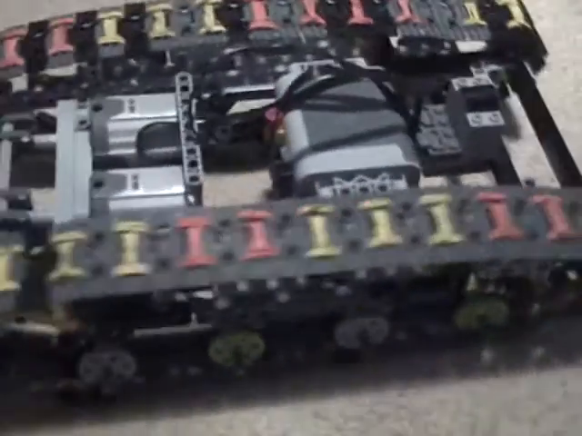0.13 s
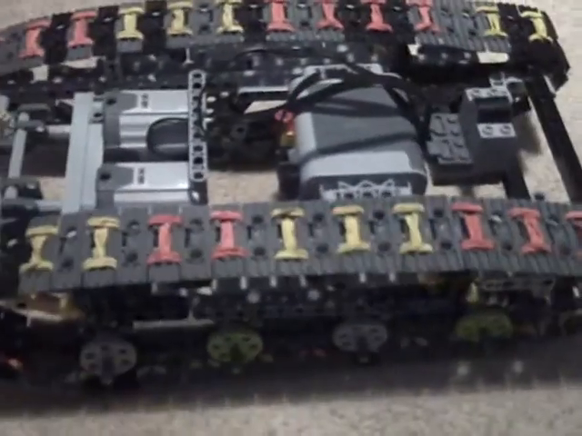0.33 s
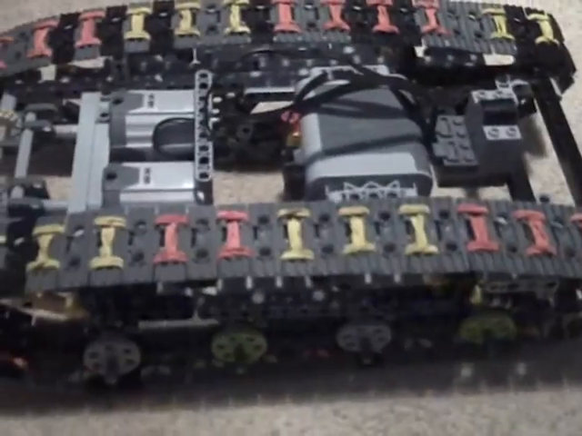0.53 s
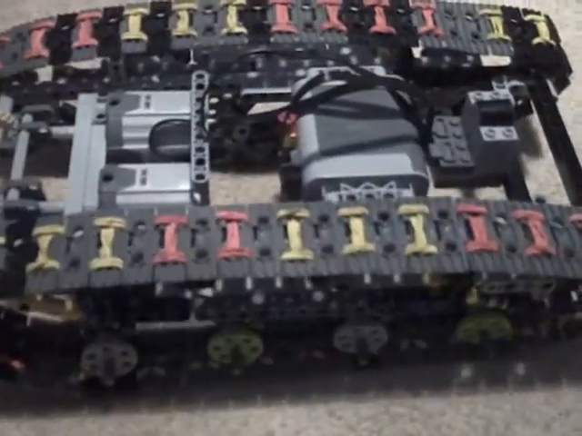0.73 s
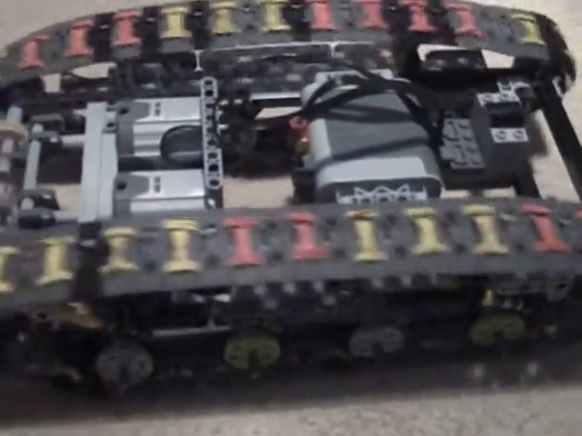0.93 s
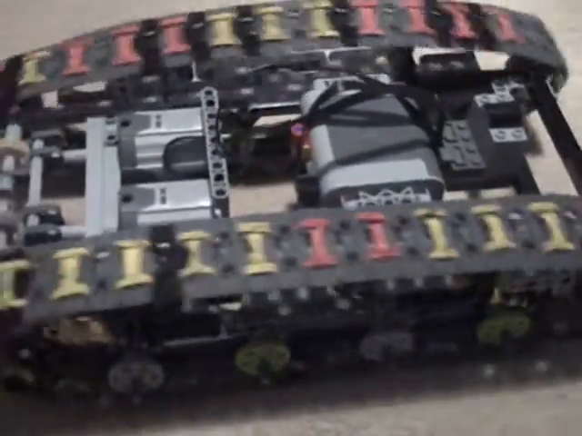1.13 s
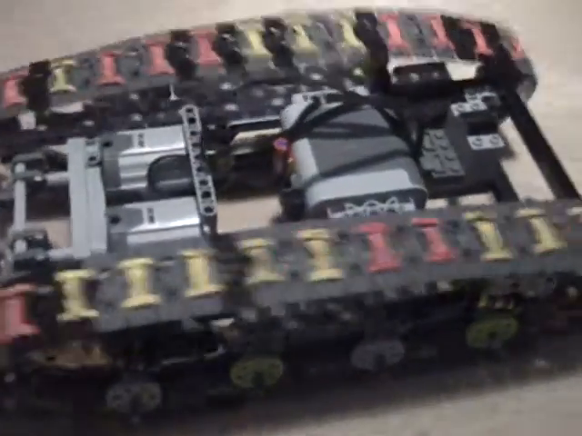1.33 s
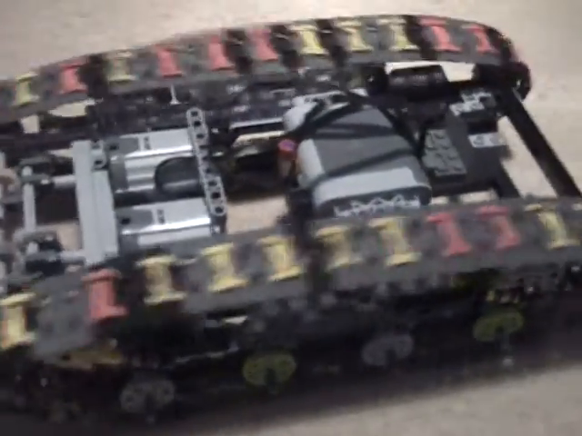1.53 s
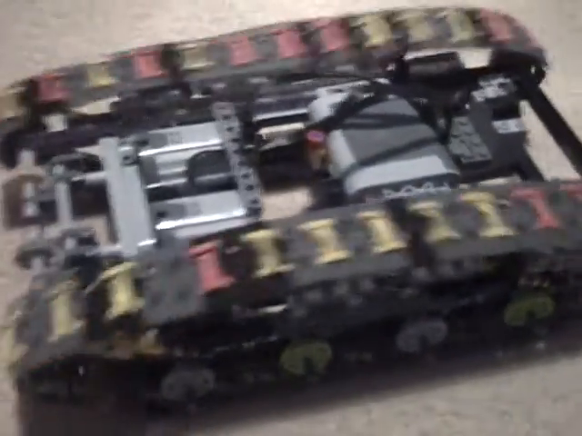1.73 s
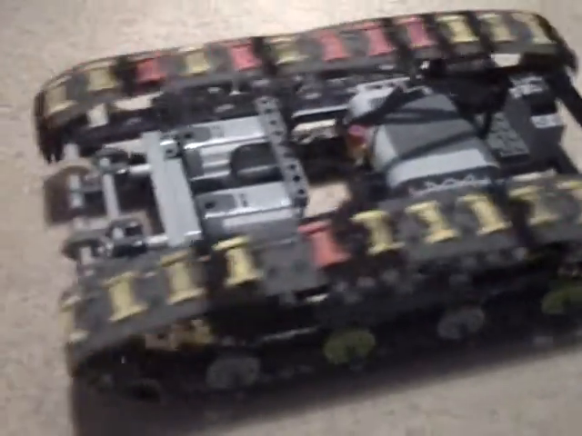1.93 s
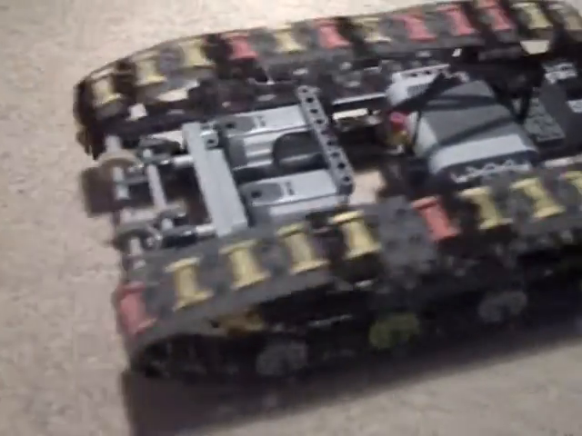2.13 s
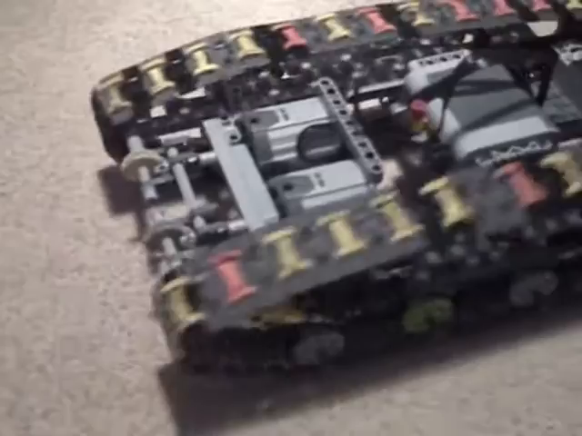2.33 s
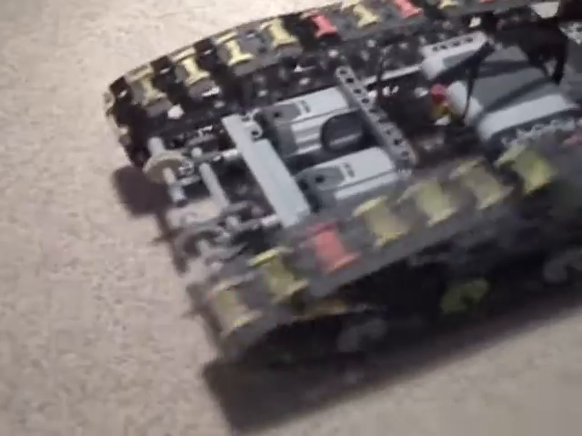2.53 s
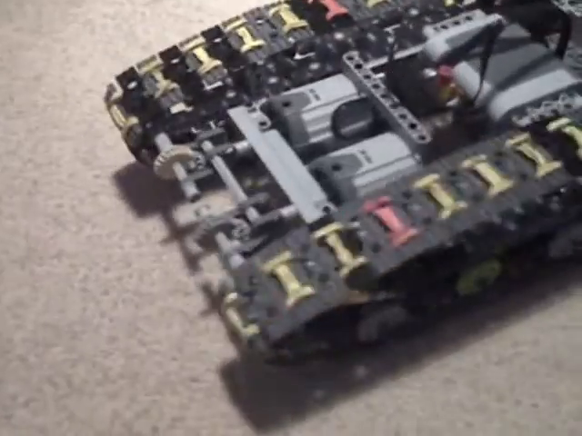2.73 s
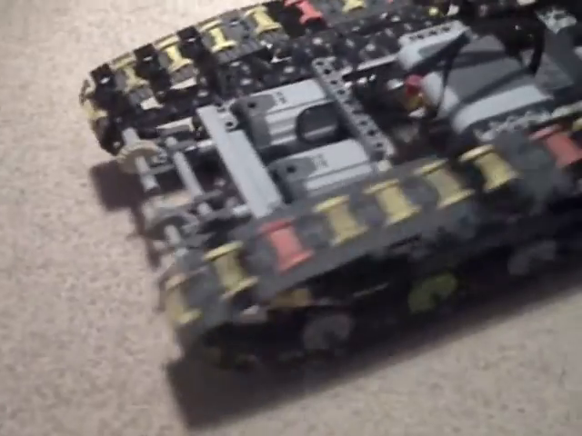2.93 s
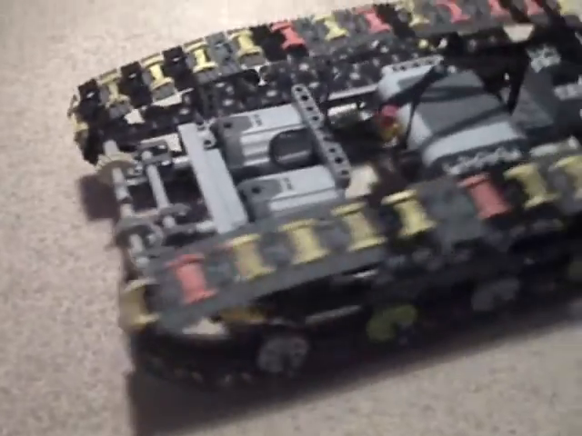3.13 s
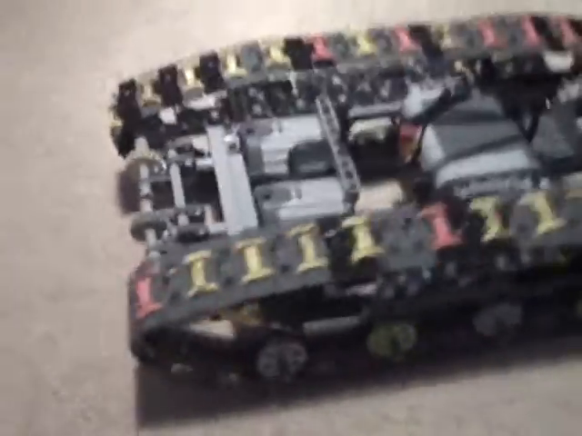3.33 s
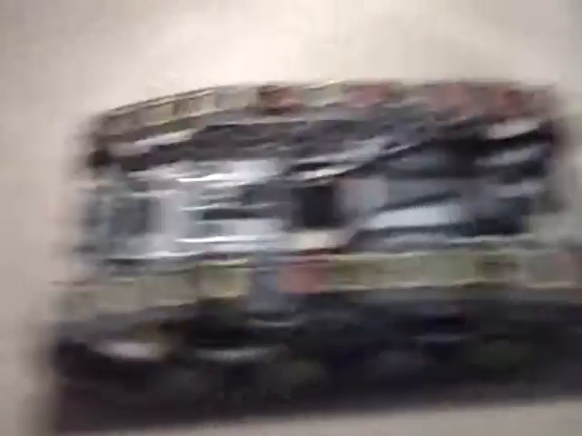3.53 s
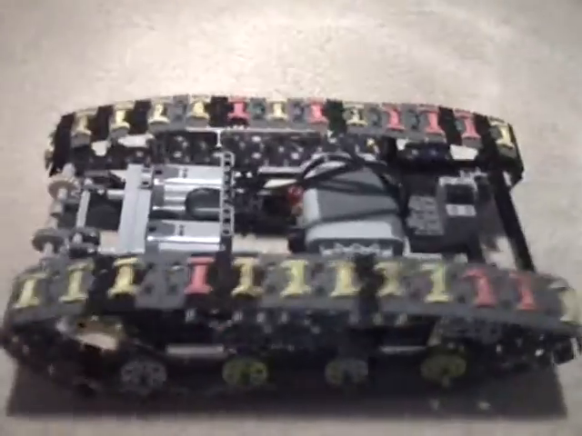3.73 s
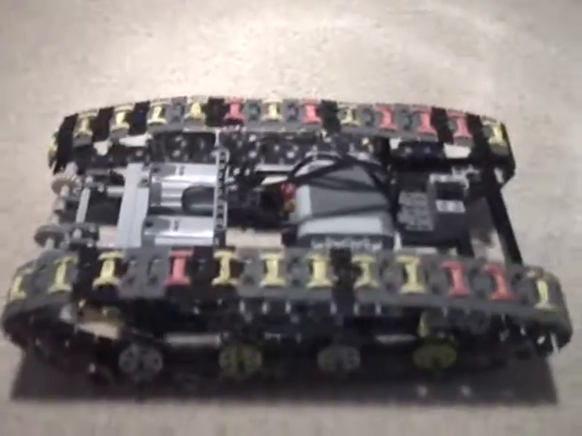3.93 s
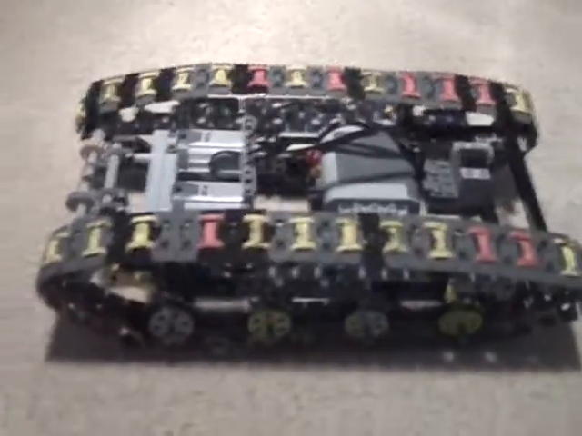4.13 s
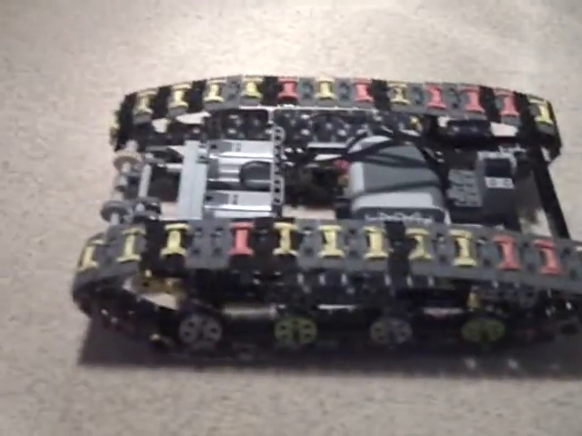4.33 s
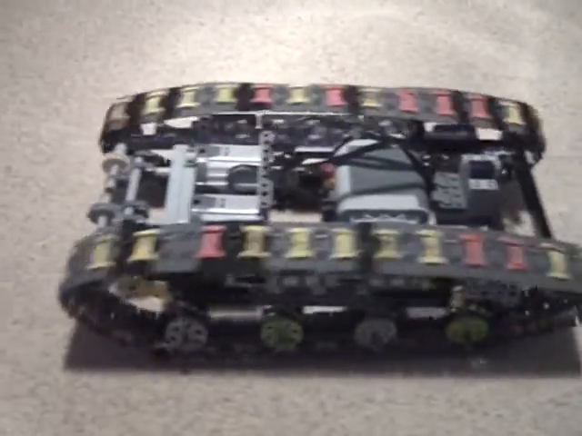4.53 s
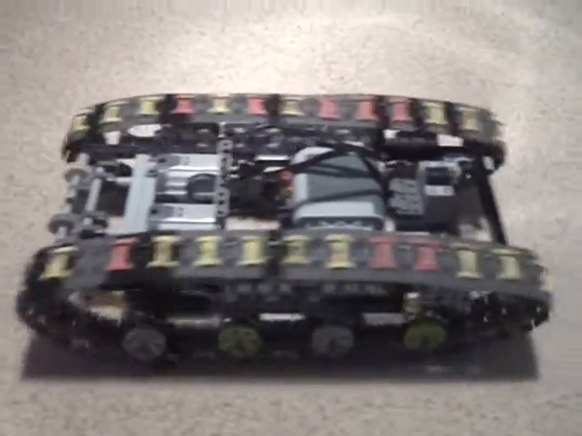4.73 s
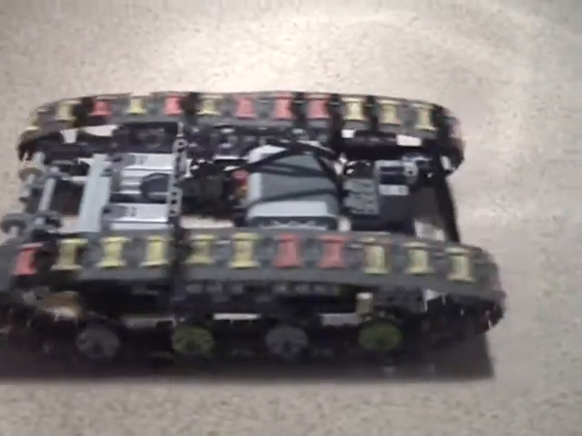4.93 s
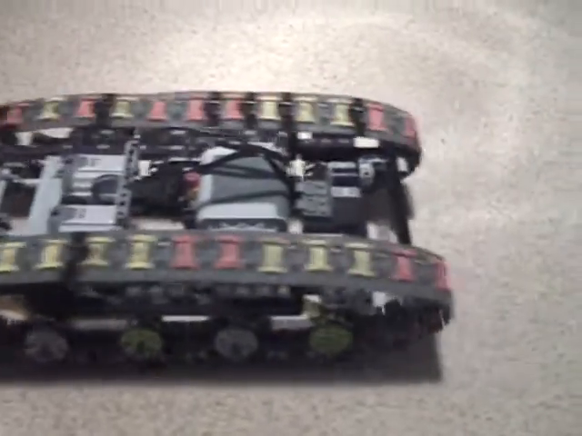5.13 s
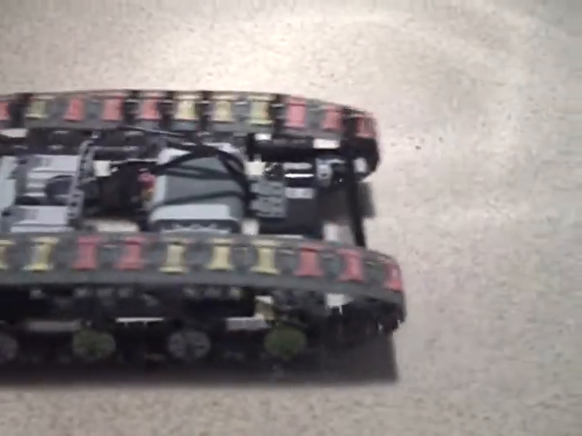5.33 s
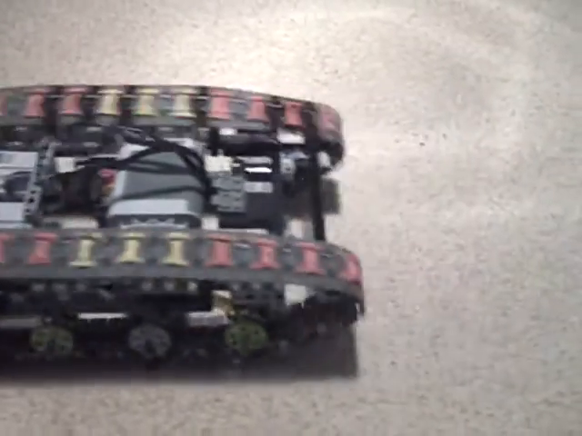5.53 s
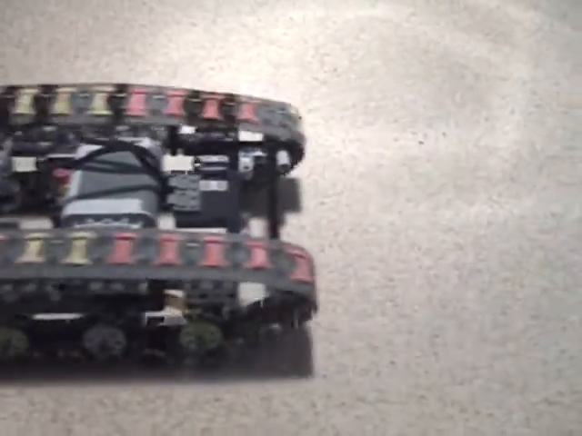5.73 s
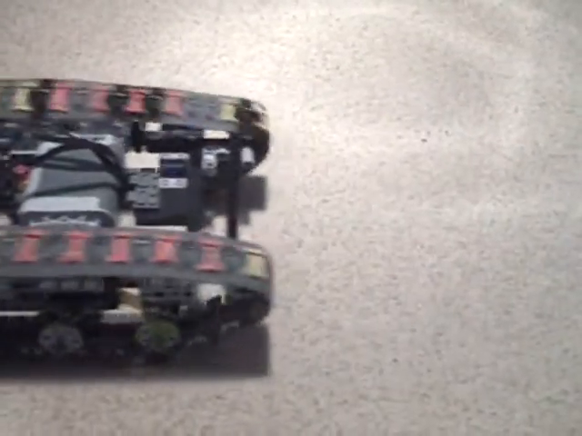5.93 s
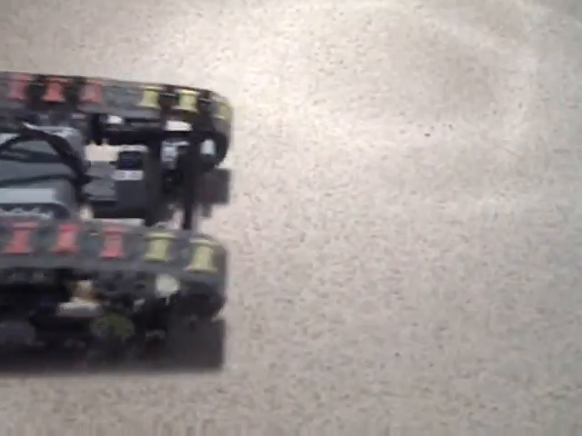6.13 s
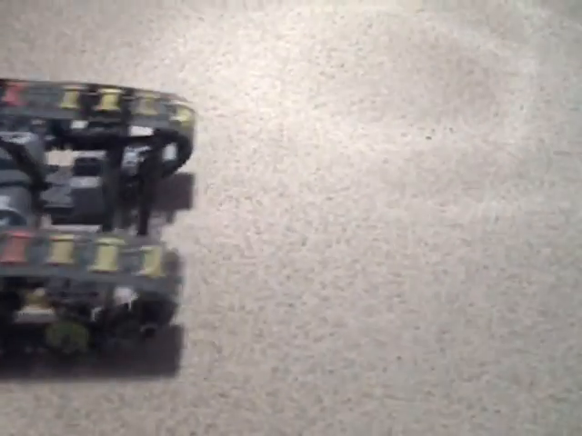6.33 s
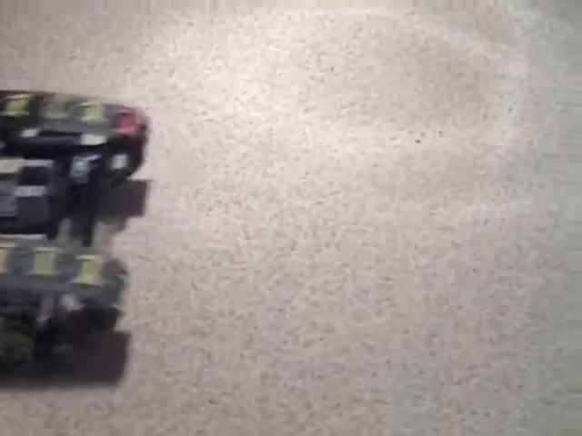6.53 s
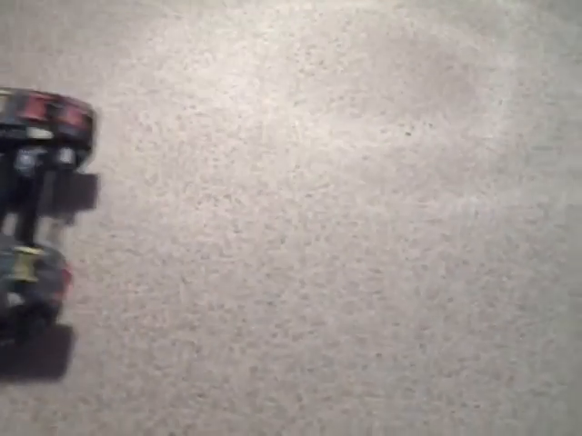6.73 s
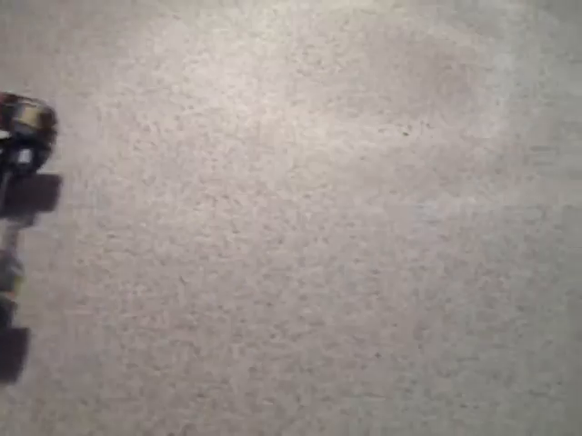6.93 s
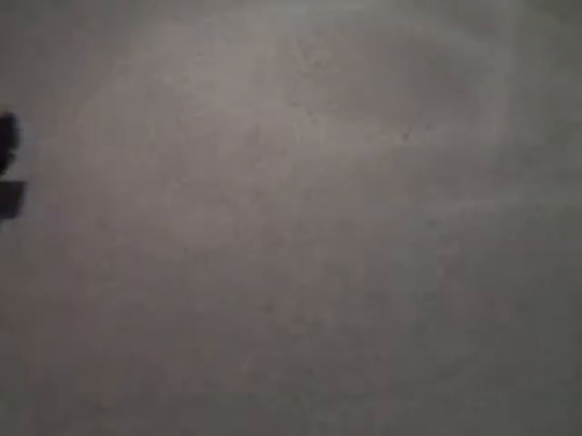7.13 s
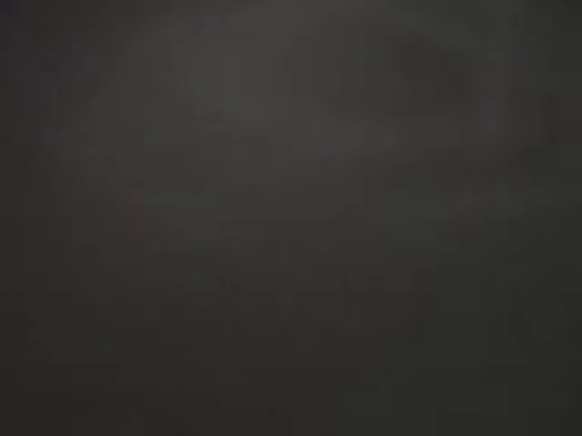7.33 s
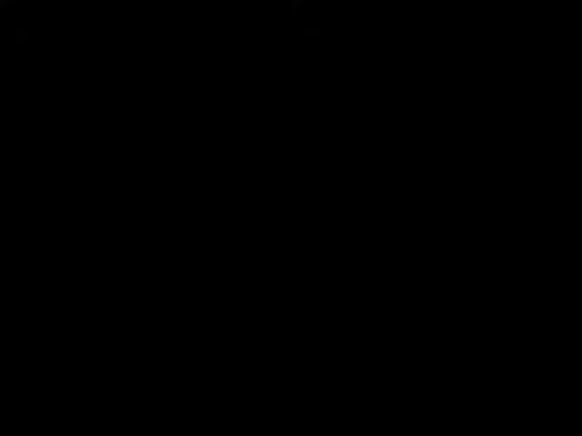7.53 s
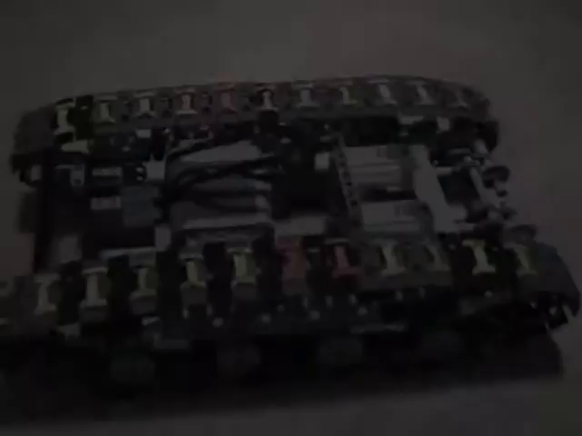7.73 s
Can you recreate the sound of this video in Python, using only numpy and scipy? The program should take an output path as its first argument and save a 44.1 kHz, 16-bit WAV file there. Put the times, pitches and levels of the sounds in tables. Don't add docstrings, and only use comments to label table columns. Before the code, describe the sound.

A small motorized tracked toy whines and rattles over carpet in long runs with short ticking nudges between, then fades to silence before a faint thump.

```python
import sys
import numpy as np
from scipy import signal
from scipy.fft import rfft, irfft
from scipy.io import wavfile
from scipy.ndimage import uniform_filter1d

SR = 44100
rng = np.random.default_rng(int(sys.argv[2]) if len(sys.argv) > 2 else 0)


def attenuation_scalar(level_db):
    decades = np.asarray(level_db, float) / 20
    return 10 ** decades


def master_out(mix):
    frames = np.transpose(np.atleast_2d(mix))
    ceiling = np.clip(frames, -1, 1)
    pcm = np.round(ceiling * 32767).astype(np.int16)
    wavfile.write(sys.argv[1], SR, pcm)


N = 343980
JAB_SHARE = 0.51

# missing_speed_share, spin_up_s, second_motor_db (against the first)
STARTS = [
    (0, .17, -14),
    (.43, .18, -9),
    (0, .17, -16),
    (.46, .16, -2.5),
]
# start_s, driven_s, gearbox_level_db, coasting_decay_db_per_s, ticking_on_s
NUDGES = [
    (.579, 0.045, -44, 250, .07),
    (.693, .038, -48.5, 330, .08),
    (.911, 0.027, -41, 300, .005),
    (2.21, 0.05, -40, 299, 0),
    (2.869, .08, -51.5, 300, 0.018),
    (4.122, 0.017, -50, 214, .045),
    (4.184, .039, -46, 700, .068),
    (4.289, .036, -52, 212, .06),
]


def level(x, db):
    return x * attenuation_scalar(db) / np.sqrt(np.mean(x ** 2))


def curves(table):
    s, *columns = np.transpose(table)
    return [np.interp(np.arange(N) / SR, s, c) for c in columns]


def held(table):
    s, *columns = np.transpose(table)
    row = np.searchsorted(s, np.arange(N) / SR, "right") - 1
    return [uniform_filter1d(c[row], size=1300) for c in columns]


def walk(rate):
    k = int(SR / rate)
    steps = np.repeat(rng.standard_normal(N // k + 1), k)
    return 1.345 * uniform_filter1d(uniform_filter1d(steps, k), k)[:N]


def ring(x, modes):
    out = 0
    for k, (hz, width, db) in enumerate(modes):
        mode = signal.lfilter(*signal.iirpeak(hz, hz / width, SR), x)
        out = out + (-1) ** k * attenuation_scalar(db) * mode
    return out


def coloured(spectrum):
    hz, db = np.transpose(spectrum)
    shape = np.interp(np.log(np.fft.rfftfreq(N, 1 / SR) + 1), np.log(hz), db)
    return level(irfft(rfft(rng.standard_normal(N)) * attenuation_scalar(shape), N), 0)


def drive():
    # time_s, free_tooth_rate_hz, gearbox_level_db, frame_db (against the gearbox)
    runs = [
        [(-.3, 918, -37.5, 2), (.23, 924, -37.5, -1), (.33, 859, -38, 0), (.415, 838, -41.5, 3)],
        [(.935, 1120, -32.5, 3), (1.1, 1120, -32.5, -3.5), (1.47, 1125, -33, -4.5), (1.8, 1150, -32.5, -5),
         (2.0, 1128, -33.5, -4.5), (2.38, 1215, -34.5, -5), (2.57, 1140, -34, -6), (2.76, 1005, -36.5, -4.5),
         (2.85, 995, -36.5, -1.5)],
        [(2.945, 1070, -38, -3), (3.05, 1075, -38, -5.5), (3.193, 1080, -38, -5), (3.26, 1025, -37.5, -4),
         (3.357, 925, -37, -3), (3.5, 930, -36, -2), (3.75, 915, -37, -1.5), (3.94, 906, -38, -.5),
         (3.99, 880, -41, 1)],
        [(4.59, 1065, -35, -2), (5.0, 1065, -34.5, -4), (5.3, 1070, -36, -2.5), (5.6, 1077, -35.5, -1.5),
         (6.0, 1072, -37.5, -1.5), (6.4, 1095, -37.5, -2), (7.0, 1092, -38.5, -1), (7.7, 1090, -40, -1.5)],
    ]
    # slowest_s, speed_lost_hz, slowing_s, recovery_s
    snags = [(.09, 36, .09, .055), (1.342, 60, .14, .12), (1.57, 50, .1, .06), (1.73, 80, .1, .07),
             (1.89, 35, .09, .07), (2.04, 27, .08, .04), (2.15, 57, .09, .05), (2.3, 77, .11, .08),
             (2.48, 25, .1, .09), (3.357, 50, .07, .13), (3.587, 65, .1, .11), (3.811, 77, .06, .09),
             (5.283, 30, .14, .11), (5.453, 29, .06, .14), (5.667, 33, .075, .19), (5.862, 45, .15, .085),
             (6.101, 19, .1, .1), (6.465, 43, .065, .135), (6.665, 43, .065, .11), (6.869, 41, .095, .115),
             (7.144, 17, .08, .08), (7.308, 34, .085, .15)]
    swell_s = 0.044
    coast_decay_db_s, frame_coast_share = 348, 0.64
    creep_db, creep_frame_db, creep_decay_db_s = -24, 5, 118
    nudge_frame_db, rest_db = -4, -77.5

    s = np.arange(N) / SR
    hz = curves(np.vstack(runs))[0]
    for at, lost_hz, slow_s, free_s in snags:
        hz -= lost_hz * np.interp(s, (at - slow_s, at, at + free_s), (0, 1, 0))

    moves = []  # (gain, frame dB, power off s, coasting dB per s)
    for run, (lag, spin_s, _) in zip(runs, STARTS):
        since = np.maximum(s - run[0][0], 0)
        speed = 1 - lag * np.exp(-since / spin_s) * (s > run[0][0] - .05)
        hz *= speed
        _, db, frame_db = curves(run)
        gain = attenuation_scalar(db) * speed * (1 - np.exp(-since / swell_s))
        moves.append((gain, frame_db, run[-1][0], coast_decay_db_s))
    for at, on_s, db, decay_db_s, _ in NUDGES:
        gain = attenuation_scalar(db) * np.clip((s - at) / (JAB_SHARE * on_s), 0, 1) ** 2
        moves.append((gain, nudge_frame_db, at + on_s, decay_db_s))

    gear_power, frame_power = attenuation_scalar(rest_db) ** 2, attenuation_scalar(rest_db + creep_frame_db) ** 2
    gains = []
    for gain, frame_db, off, decay_db_s in moves:
        after = np.maximum(s - off, 0)
        creep = gain * attenuation_scalar(creep_db - creep_decay_db_s * after)
        gains.append(gain * attenuation_scalar(-decay_db_s * after))
        gear_power = gear_power + gains[-1] ** 2 + creep ** 2
        frame = gain * attenuation_scalar(frame_db - frame_coast_share * decay_db_s * after)
        frame_power = frame_power + frame ** 2 + (creep * attenuation_scalar(creep_frame_db)) ** 2
    gear_db = 10 * np.log10(gear_power)
    frame_db = 10 * np.log10(frame_power / gear_power)
    return hz, gains[:len(runs)], gear_db, frame_db


def whine(hz, gains):
    # start_s, harmonic_2_db, harmonic_3_db, harmonic_4_db, harmonic_5_db
    voice = [(0, -10, -14, -13, -11), (.375, -22, -26, -19, -24), (1.03, -28, -20, -12, -15),
             (1.19, -32, -21, -12, -30), (1.355, -20, -13, -21, -27), (1.92, -16, -20, -23, -30),
             (2.52, -20, -24, -17, -26), (2.9, -25, -24, -28, -26), (3.06, -12, -20, -18, -22),
             (3.24, -24, -20, -18, -13), (3.3, -11, -15, -17, -10), (3.975, -22, -24, -24, -24),
             (4.64, -20, -16, -15, -21), (4.78, -18, -15, -19, -16), (5.0, -17, -13, -19, -20),
             (5.4, -15, -14, -19, -24), (6.0, -15, -13, -17, -24), (7.3, -19, -17, -20, -28)]
    speeds = 1 + 0.00751 * walk(120), 1 + 0.01196 * walk(90) + .022 * walk(11)
    flutter_db = [[1.8 * walk(70) + .4 for _ in range(6)] for _ in speeds]
    second, third, fourth, fifth = (db + 1.5 * walk(11) for db in held(voice))
    harmonics_db = [second - 15, second, third, fourth, fifth, third - 5]
    twin = sum(gain * attenuation_scalar(twin_db) for gain, (_, _, twin_db) in zip(gains, STARTS))
    unloaded = (np.gradient(hz) * SR > 250) & (hz > 1050)
    load_db = uniform_filter1d(-10. * unloaded, 600)
    out = np.zeros(N)
    for speed, flutter, gain in zip(speeds, flutter_db, (sum(gains), twin)):
        turn = 2 * np.pi * np.cumsum(hz * speed) / SR
        for k, db in enumerate(harmonics_db):
            line_gain = gain * np.sqrt(2) * attenuation_scalar(db + load_db + flutter[k])
            out += line_gain * np.sin((k + 1) * turn)
    return out


def impacts(rate, spread_db, hiss):
    strength_db = abs(spread_db) * np.minimum(rng.exponential(size=N), 5)
    hit = (rng.random(N) < rate / SR) * rng.choice([-1, 1], N) * attenuation_scalar(strength_db)
    return level(hit, 0) + hiss * rng.standard_normal(N)


def carpet_rumble(frame_db):
    # frequency_hz, density_db (per Hz)
    carpet = [(21, -35.5), (35, -6.5), (308, -3.5), (374, -4), (684, -3.5), (800, 2), (1040, -7.5),
              (1760, -120)]
    return coloured(carpet) * attenuation_scalar(-28.5 + 0.81 * (frame_db + 5.5) + 2.3 * walk(7.8))


def rattle(tooth_hz, gear_db, frame_db):
    # frequency_hz, width_hz, level_db
    gearbox = [(7660, 716, -0.68), (8560, 1170, -1.4), (9580, 800, -0.53), (10300, 600, -1.44)]
    can = [(6185, 740, -4), (6967, 910, 0.5)]
    links = [(11500, 1300, 0), (12800, 1600, -1), (14300, 2000, -3), (15500, 1200, -4)]
    frame = [(2056, 1090, -7.5), (3374, 474, -2), (4180, 820, -2.5), (5340, 370, -5.5), (5620, 174, -5)]
    plate = [(710, 205, -6), (924, 210, 3), (1617, 620, 0)]
    # start_s, motor_can_db, track_links_db, base_plate_db
    facing = [(0, -2, -7.5, -21.5), (.42, -2, -8, -8.5), (.9, -3, -6.5, -14.5), (1.3, -5.5, -7.5, -18.5),
              (2.5, -7, -8, -18.5), (2.9, -5.5, -7.5, -21.5), (3.3, -5.5, -8.5, -33.5), (4.02, -4, -12, -8),
              (4.58, -5.5, -7, -22.5), (5.5, -4.5, -5.5, -17), (6.5, -4.5, -4.5, -18)]

    can_db, link_db, plate_db = held(facing)
    turn = 2 * np.pi * np.cumsum(tooth_hz) / SR
    throb_db = 1.1 * np.sin(turn / 20) + 0.57 * np.sin(turn / 6.5) + 0.73 * walk(60) + 0.5 * walk(16)
    shake = impacts(rate=3000, spread_db=2.5, hiss=1.0) * attenuation_scalar(throb_db)
    mesh = sum(np.cos(k * (turn + .3 * walk(150))) for k in range(6, 12))
    shake = shake + mesh * np.clip((1150 - tooth_hz) / 1600, .03, .16)
    out = level(ring(shake, gearbox), 0) * attenuation_scalar(0.18 * walk(25))
    out += level(ring(shake, can), 0) * attenuation_scalar(can_db + 0.32 * walk(25))
    out += level(ring(shake, links), 0) * attenuation_scalar(link_db + .7 * walk(25))
    heavy = impacts(rate=5000, spread_db=1.5, hiss=1.75) * attenuation_scalar(1.48 * throb_db + 0.29 * walk(18))
    out += level(ring(heavy, frame), -3.0) * attenuation_scalar(frame_db)
    out += level(ring(heavy, plate), 0.87) * attenuation_scalar(plate_db + 0.62 * frame_db + 0.67 * walk(15))
    out += carpet_rumble(frame_db)
    return out * attenuation_scalar(gear_db + 1.0)


def crawl():
    tooth_gap_s, gap_ratio = .0062, 0.98
    start, on_s, db, decay_db_s, ticking_s = np.transpose(NUDGES)[:, :, None]
    chance = rng.standard_normal((len(NUDGES), 16, 3))
    coasting_teeth = np.maximum(np.arange(16) - on_s / tooth_gap_s, 0)
    gaps = tooth_gap_s * gap_ratio ** coasting_teeth * np.exp(.2 * chance[..., 0])
    s = start + np.cumsum(gaps, axis=1)
    after = s - start - on_s
    swell_db = 20 * np.log10(np.minimum((s - start) / (JAB_SHARE * on_s), 1))
    peak_db = db + 11.5 - 0.38 * decay_db_s * np.maximum(after, 0) + swell_db
    peak_db += 1.8 * chance[..., 1] - 99 * (after > ticking_s)
    frame_db = -9 + 3.5 * chance[..., 2]
    return np.stack([s, peak_db, frame_db], axis=2).reshape(-1, 3)


def ticks():
    # start_s, peak_db, frame_db (against the tooth)
    knocks = [(.1238, -23, -1), (.4823, -46, -2), (.5455, -53, 12), (.5618, -44, 16), (.5834, -47, -2),
              (.6012, -28, -9), (.7021, -33, -12), (.7211, -28, -18), (.837, -50, -11), (.8695, -49, -10),
              (.8876, -45, -11), (.9029, -49, -7), (.9285, -33, -7), (.9345, -30, -9), (2.8729, -33, -2),
              (2.8988, -19, -9), (2.9059, -38, -2), (4.0915, -52, -4), (4.1289, -36, -9),
              (4.1928, -30, -12), (4.2237, -31, -12), (4.3064, -33, -14), (4.3916, -37, 15),
              (4.404, -52, -7), (4.4769, -51, -7), (4.5966, -42, -11)]
    # frequency_hz, width_hz, level_db
    tooth_modes = [(6800, 500, 0), (8000, 700, -6), (10200, 900, -2), (12500, 1500, -12),
                   (14500, 1500, -17)]
    # frequency_hz, width_hz, level_db
    knock_modes = [(1700, 900, -8), (2700, 900, -1), (3900, 700, 0), (4600, 800, -3)]
    teeth = np.vstack([knocks, crawl()])
    decay = np.exp(-np.arange(400) / (.0006 * SR))
    scrape = rng.standard_normal((len(teeth), 400)) * decay
    tooth, knock = ring(scrape, tooth_modes), ring(scrape, knock_modes)
    tooth = tooth / np.abs(tooth).max(axis=1, keepdims=True)
    knock = knock / np.abs(knock).max(axis=1, keepdims=True)
    out = np.zeros(N)
    for (s, db, frame_db), high, low in zip(teeth, tooth, knock):
        i = int(s * SR)
        out[i:i + 400] += high * attenuation_scalar(db + min(0, -frame_db)) + low * attenuation_scalar(db + min(0, frame_db))
    return out * attenuation_scalar(1.5)


def room(x, t60, wet_db):
    s = np.arange(int(.4 * SR)) / SR
    echo = rng.standard_normal(len(s)) * np.exp(-np.log(1000) * s / t60) * (s > .003)
    echo = signal.lfilter([1], [1, -.4], echo)
    echo = echo / np.sqrt(np.sum(echo ** 2))
    return x + attenuation_scalar(wet_db) * signal.fftconvolve(x, echo)[:N]


def room_hush():
    # frequency_hz, density_db (per Hz)
    air = [(20, -15), (50, -14), (130, -16), (400, -20), (2000, -29), (6000, -35), (16000, -37)]
    return coloured(air) * attenuation_scalar(-67.5)


def fader():
    return np.interp(np.arange(N) / SR, (5.7, 7.682), (1, 0))


def handling_bump():
    # time_s, level_db
    handling = [(7.72, -99), (7.74, -89), (7.8, -57)]
    bump = coloured([(10, 2), (60, -15), (300, -25), (600, -59), (20000, -76)])
    return bump * attenuation_scalar(curves(handling)[0]) * (np.arange(N) > 7.725 * SR)


def scene():
    tooth_hz, gains, gear_db, frame_db = drive()
    vehicle = whine(tooth_hz, gains) + rattle(tooth_hz, gear_db, frame_db) + ticks()
    toy = room(vehicle, t60=.22, wet_db=-15)
    mono = (toy + room_hush()) * fader() + handling_bump()
    return np.tile(mono, (2, 1))


def band_limit(x):
    return signal.sosfilt(signal.butter(12, 17050, fs=SR, output="sos"), x)


def record(dry):
    top_cut = signal.ellip(10, .2, 60, 15800, fs=SR, output="sos")
    mix = signal.sosfilt(top_cut, dry) - .00055 * fader()
    return band_limit(mix)


dry = scene()
out = record(dry)
master_out(out)
```